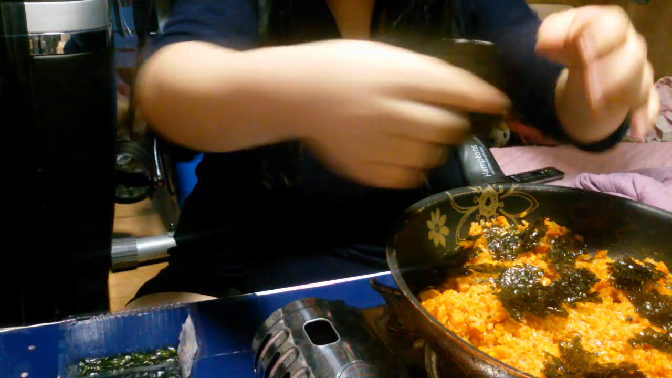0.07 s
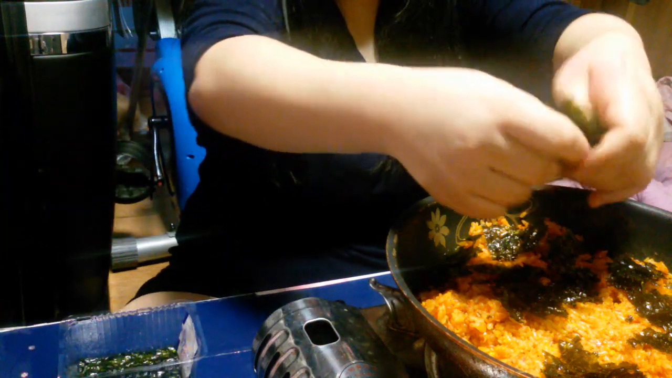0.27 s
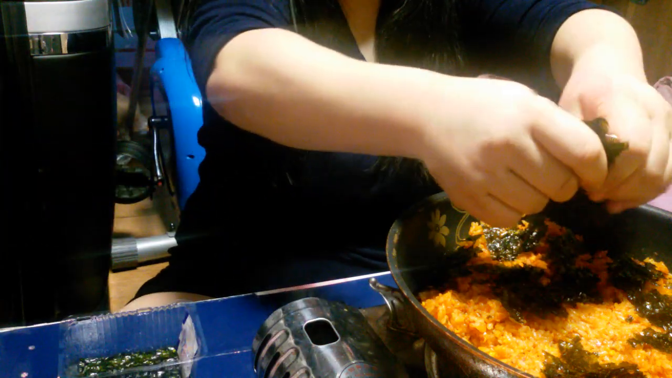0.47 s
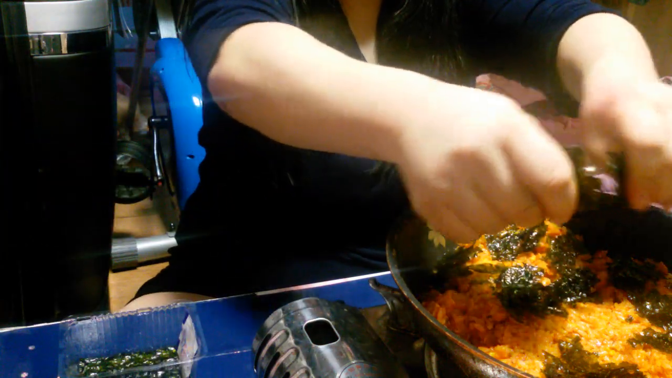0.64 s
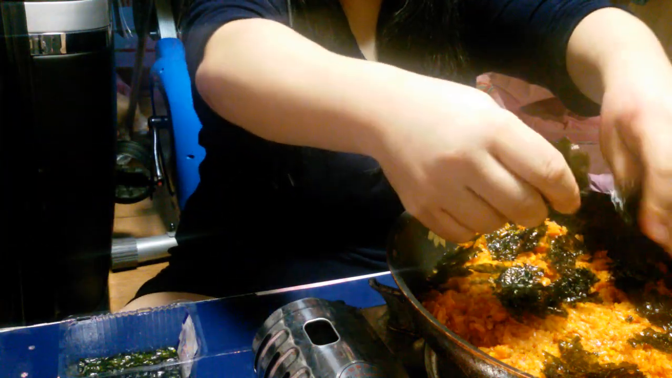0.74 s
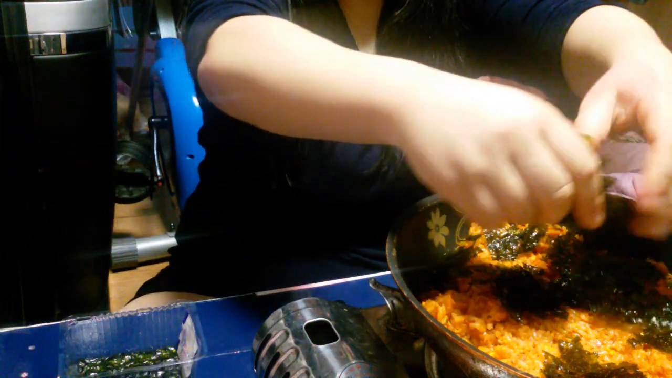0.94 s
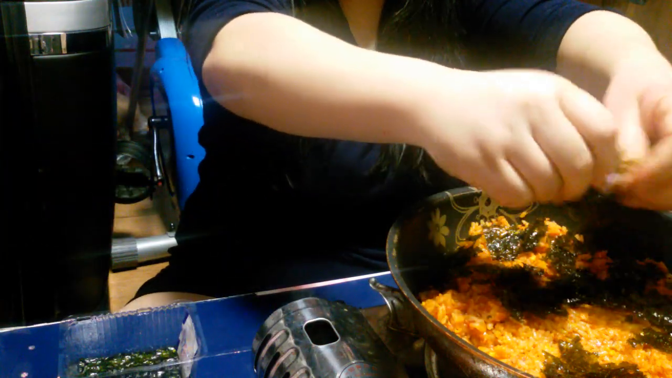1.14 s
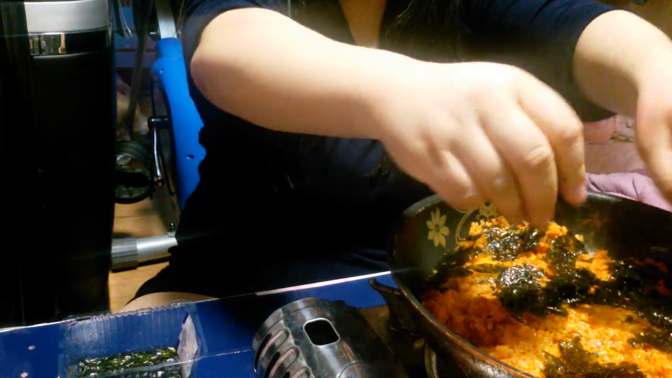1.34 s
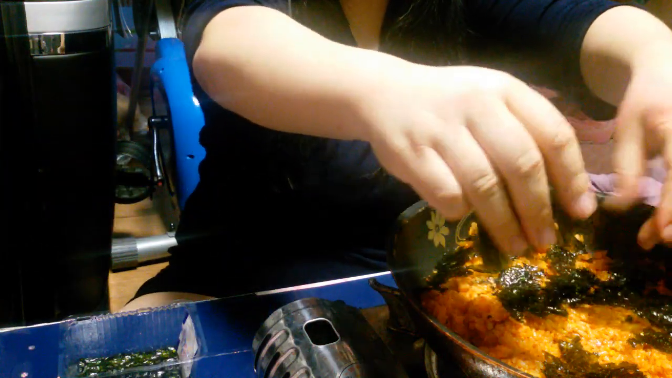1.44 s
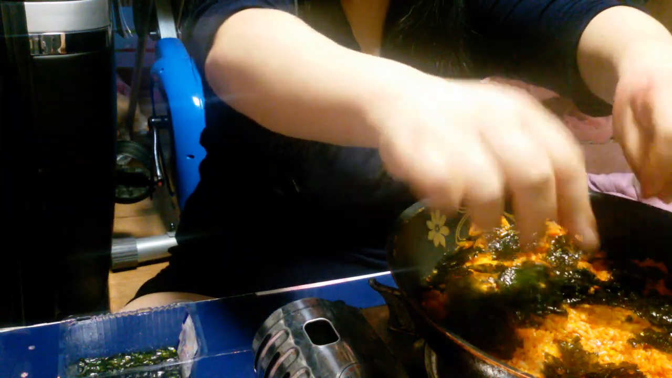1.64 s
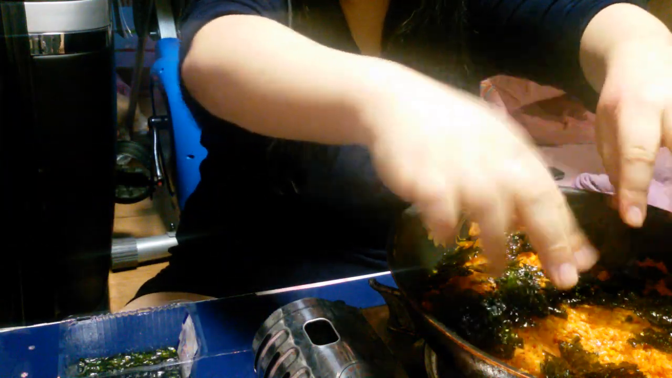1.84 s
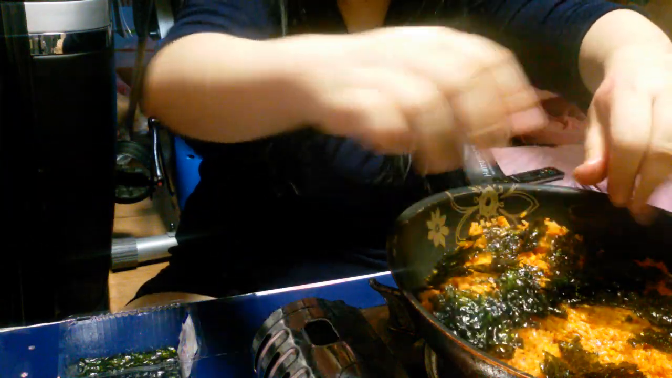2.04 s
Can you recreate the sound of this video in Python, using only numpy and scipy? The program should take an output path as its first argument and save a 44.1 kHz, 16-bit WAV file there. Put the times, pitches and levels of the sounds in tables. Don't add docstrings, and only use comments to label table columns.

```python
import sys
import numpy as np
from scipy import signal
from scipy.fft import rfft, irfft
from scipy.io import wavfile

SR = 44100
rng = np.random.default_rng(int(sys.argv[2]) if len(sys.argv) > 2 else 0)


def rack_gain(trim_db):
    fader = np.asarray(trim_db, float)
    return 10 ** (fader / 20)


def bounce(signal):
    frames = np.transpose(np.atleast_2d(signal))
    limited = np.clip(frames, -1, 1)
    pcm = np.round(limited * 32767).astype(np.int16)
    wavfile.write(sys.argv[1], SR, pcm)


N = 90405


def rms_one(x):
    return x / np.sqrt(np.mean(x ** 2) + 1e-20)


def in_time(rows):
    time_s, *columns = np.transpose(rows)
    return [np.interp(np.arange(N) / SR, time_s, c) for c in columns]


def at_hz(points, hz):
    table_hz, table_db = np.transpose(points)
    return np.interp(np.log(hz), np.log(table_hz), table_db)


def drift(rate_hz):
    r = np.exp(-2 * np.pi * rate_hz / SR)
    wander = signal.lfilter([1], [1, -2 * r, r * r], rng.standard_normal(N + SR))
    return rms_one(wander[SR:])


def resonate(x, hz, width_hz):
    r = np.exp(-np.pi * width_hz / SR)
    poles = [1, -2 * r * np.cos(2 * np.pi * hz / SR), r * r]
    return signal.lfilter(np.array([1, 0, -1]) * (1 - r * r) / 2, poles, x + 1e-18)


# (time [s], level [dB])
WHINE_LEVEL = [(0, -59.5), (.5, -51), (1.0, -53), (1.6, -57), (2.05, -62.5)]


def whine_level_db():
    return in_time(WHINE_LEVEL)[0]


# (frequency [Hz], level [dB per Hz])
HISS_SPECTRUM = [(25, -9.5), (60, -2.5), (300, -4.5), (600, -8.5), (2000, -16.5), (4000, -20.5),
                 (6200, -23.5), (14500, -25)]
# (frequency [Hz], width [Hz], level [dB])
HUMS = [(66.4, 44, -74.5), (125.5, 17, -65.5), (409, 4, -67.5)]
HISS_DB, GAIN_FOLLOW = -57.5, .77


def background():
    gain_db = whine_level_db()
    bins_hz = np.maximum(np.fft.rfftfreq(N, 1 / SR), 1)
    hiss = rms_one(irfft(rfft(rng.standard_normal(N)) * rack_gain(at_hz(HISS_SPECTRUM, bins_hz)), N))
    hum = 0
    for hz, width_hz, db in HUMS:
        hum = hum + rack_gain(db) * rms_one(resonate(rng.standard_normal(N + SR), hz, width_hz)[SR:])
    return rack_gain(GAIN_FOLLOW * (gain_db - gain_db.mean())) * (rack_gain(HISS_DB) * hiss + hum)


WHINE_HZ, SAG_HZ, SAG_RATE_HZ = 6420, 430, 130.0
FLUTTER_DB, FLUTTER_RATE_HZ = 2.5, 34.0


def whine():
    load = np.maximum(drift(SAG_RATE_HZ) + .1, 0)
    hz = WHINE_HZ - SAG_HZ * np.tanh(load ** 2 / 1.3) + 30 * drift(20.0)
    level = rack_gain(whine_level_db() + FLUTTER_DB * drift(FLUTTER_RATE_HZ))
    return np.sqrt(2) * level * np.sin(2 * np.pi * np.cumsum(hz) / SR)


ROOM_T60_S, ROOM_DB = .18, -12


def room(x):
    t = np.arange(SR // 3) / SR
    tail = rng.standard_normal(len(t)) * rack_gain(-60 * t / ROOM_T60_S) * (t > .003)
    tail = signal.lfilter([.5], [1, -.5], tail)
    return rack_gain(ROOM_DB) * signal.fftconvolve(x, tail / np.sqrt(np.sum(tail ** 2)))[:N]


# (frequency [Hz], width [Hz], level [dB])
BOWL_MODES = [(281, 72, -29), (407, 31, -28), (703, 42, -26), (1075, 120, -24)]


def bowl(x):
    out = 0
    for hz, width_hz, db in BOWL_MODES:
        out = out + rack_gain(db + 22) * resonate(resonate(x, hz, width_hz), hz, width_hz)
    return out


BODY_LOW_HZ, EDGE_HZ = 884, 8100
BREAK_LAG_S, BREAK_DB = .0009, -1
RING_CYCLES, RING_DB = 24, -3
RATTLE_S, RATTLE_DB = .006, -20.5
SNAP_S, TICK_S = .0012, .0004


def breaks(table, length_s):
    out, t = np.zeros(N + SR), np.arange(SR // 12) / SR
    noise = rng.standard_normal((len(table), 2, len(t)))
    low_cut = signal.butter(2, BODY_LOW_HZ, "high", fs=SR, output="sos")
    edge_cut = signal.butter(2, EDGE_HZ, "high", fs=SR, output="sos")
    for (time_s, peak_db, ring_hz, bright_db), (grain, splinters) in zip(table, noise):
        rattle = rack_gain(RATTLE_DB) * np.exp(-t / RATTLE_S) * splinters ** 2 / 2
        crack = np.sign(grain) * (.5 + np.abs(grain)) * (np.exp(-t / length_s) + rattle)
        ring = rms_one(resonate(crack, ring_hz, 1.9 * ring_hz / RING_CYCLES))
        body = rms_one(resonate(signal.sosfilt(low_cut, crack), 5000, 5000))
        edge = rms_one(signal.sosfilt(edge_cut, crack))
        mix = rack_gain(RING_DB) * ring + body + rack_gain(bright_db) * edge
        i = int((time_s + BREAK_LAG_S) * SR)
        out[i:i + len(t)] += rack_gain(peak_db + BREAK_DB) * mix / np.abs(mix).max()
    return out[:N]


# (time [s], peak level [dB], ring [Hz], brightness [dB])
CRUMB_DROPS = [
    (1.601, -44, 2580, -14),
    (1.647, -47, 5400, -5),
    (1.705, -43.5, 3020, -8),
    (1.813, -41.5, 3370, -5),
    (1.845, -57, 5200, -15),
]


def crumbs():
    return breaks(CRUMB_DROPS, SNAP_S)


# (time [s], peak level [dB], ring [Hz], brightness [dB])
EDGE_TICKS = [(0.1286, -21, 6930, 3), (0.1894, -31, 6400, 3), (0.2613, -22, 5110, 3),
              (0.4534, -19, 6620, 3), (0.5044, -15, 6940, 3), (0.5264, -16, 5190, 3),
              (0.5616, -11, 5140, 3), (0.5864, -13, 4960, 3), (0.7462, -22, 5330, 3),
              (0.7634, -23, 5600, 3), (0.8894, -32, 6410, 3), (1.2516, -14, 6470, 3),
              (1.2905, -11, 9420, 3), (1.3084, -25, 6400, 3), (1.515, -22, 5700, 3), (1.5414, -32, 6410, 3)]


def ticks():
    return rack_gain(3.5) * breaks(EDGE_TICKS, TICK_S)


# (time [s], peak level [dB], ring [Hz], brightness [dB])
FOLD_SNAPS = [(0.0341, -27, 4330, -17), (0.1523, -26, 5500, -26), (0.2063, -29, 5800, -19),
              (0.2279, -17.5, 5430, -6), (0.2624, -24, 5340, -1), (0.2982, -16.5, 5060, -7),
              (0.321, -10.5, 5600, -13.5), (0.4309, -21, 5380, -2.5), (0.4415, -16, 6100, 3),
              (0.4778, -15.5, 6150, 3), (0.5654, -11.5, 5330, -6.5), (0.6039, -14.5, 4500, -0.5),
              (0.616, -7, 4880, 1.5), (0.6854, -21, 5400, -2.5), (0.7355, -23, 5200, 3),
              (0.777, -23, 6700, -14), (0.9702, -30.5, 6390, -4), (1.0096, -28, 5900, -10),
              (1.0614, -30, 6800, -1), (1.1224, -25.5, 5400, 3.5), (1.1423, -28, 5800, 9),
              (1.1957, -30, 5900, -9), (1.2134, -49, 5000, -3), (1.2319, -22.5, 6400, -63),
              (1.3983, -21, 7300, -12.5), (1.4252, -19.5, 6240, 3)]


def snaps():
    return breaks(FOLD_SNAPS, SNAP_S)


# (time [s], level [dB], piece size [dB per octave toward the bass])
SQUEEZE_EFFORT = [
    [(0, -69.5, -4), (.045, -53, 0), (.11, -67, -1), (.16, -45, 2.2), (.205, -66.5, -12.5)],
    [(.24, -45, 0.7), (.28, -43, -0.3), (.32, -36, 2.56), (.42, -39.5, 0.4), (.54, -31.5, -1.7),
     (.62, -28, -0.1), (.66, -39, 2.8), (.72, -54, 3.5)],
    [(.76, -48.5, -3.5), (.81, -37.5, -1.3), (.9, -48.5, -1.3), (.96, -58, -4), (1.09, -53.5, 3)],
    [(1.145, -36.5, 2.5), (1.18, -45.5, -3.5), (1.21, -33, 4.3), (1.25, -36.5, 1.2), (1.28, -47.5, -9),
     (1.31, -57, -6), (1.355, -64, -8)],
    [(1.4, -37.5, -2.5), (1.43, -32, 3), (1.47, -49, -4.3), (1.56, -63.5, -4), (1.74, -64, 4),
     (1.785, -57, -1), (1.85, -69.5, -1), (2.05, -73, -6)],
]
# (frequency [Hz], level [dB per Hz])
FLAKE_SPECTRUM = [(250, -40.5), (600, -25.5), (1100, -17.5), (2200, -9), (3300, -10.5), (5300, 1.5),
                  (8000, -6.5), (14500, -12.5)]
CRACKS_PER_S, RATE_FOLLOW = 9000, .2
SIZE_SPREAD_DB, CLUMP_DB, CLUMP_RATE_HZ = 4.0, 3.5, 120.0
FLAKE_SHARE, FLAKE_CYCLES, CRUMBLE_DB = .25, 12, 2.5


def crumble():
    effort_db, tilt_db = in_time(np.concatenate(SQUEEZE_EFFORT))
    below_peak_db = RATE_FOLLOW * (effort_db - effort_db.max())
    sizes = rack_gain(SIZE_SPREAD_DB * np.minimum(rng.exponential(1, N), 3)) * rng.choice([-1, 1], N)
    rate = CRACKS_PER_S * rack_gain(below_peak_db + CLUMP_DB * drift(CLUMP_RATE_HZ))
    cracks = sizes * (rng.random(N) < rate / SR) * rack_gain(-below_peak_db / 2)
    flakes = 0
    for hz in np.geomspace(300, 14500, num=24):
        share = cracks * (rng.random(N) < FLAKE_SHARE)
        gain = rack_gain(at_hz(FLAKE_SPECTRUM, hz) + tilt_db * np.log2(5000 / hz))
        flakes = flakes + gain * resonate(share, hz, 2.74 * hz / FLAKE_CYCLES)
    return rack_gain(effort_db + CRUMBLE_DB) * (rms_one(flakes) + bowl(rms_one(cracks)))


SIDE_DB = -36.5


def scene():
    hands = crumble() + snaps() + ticks() + crumbs()
    mid = hands + room(hands) + background() + whine()
    return mid + rack_gain(SIDE_DB) * np.roll(mid, shift=300) * [[1], [-1]]


def roll_off(x):
    return signal.sosfilt(signal.butter(12, 15880, fs=SR, output="sos"), x)


def record(dry):
    return roll_off(dry)


dry = scene()
out = record(dry)
bounce(out)
```